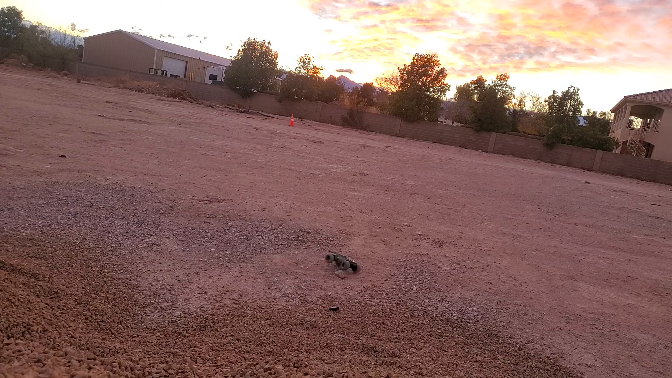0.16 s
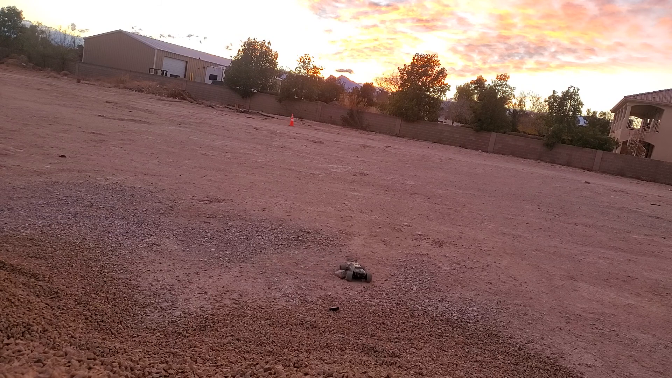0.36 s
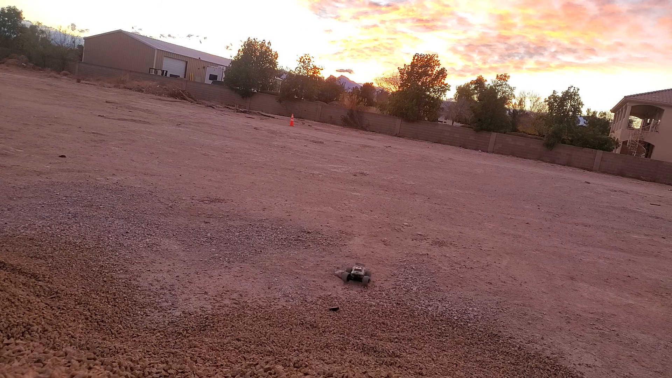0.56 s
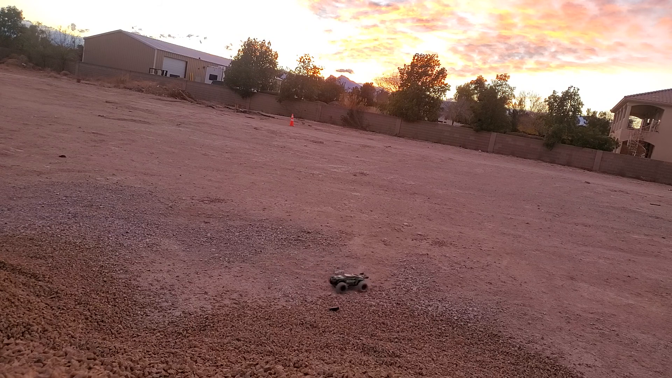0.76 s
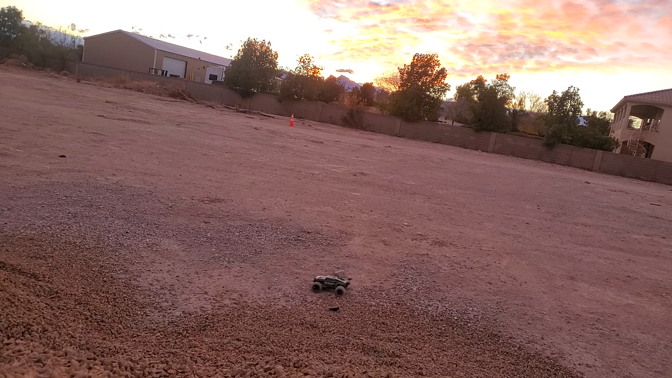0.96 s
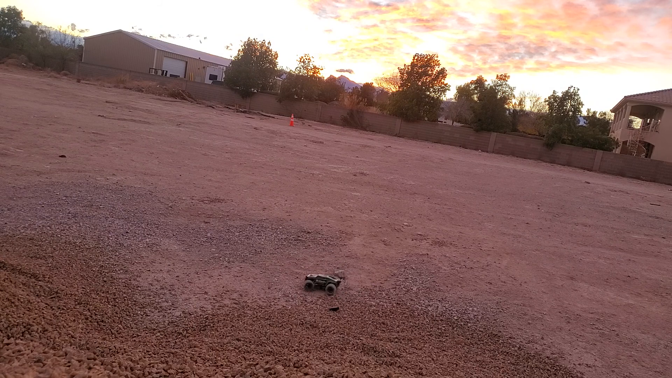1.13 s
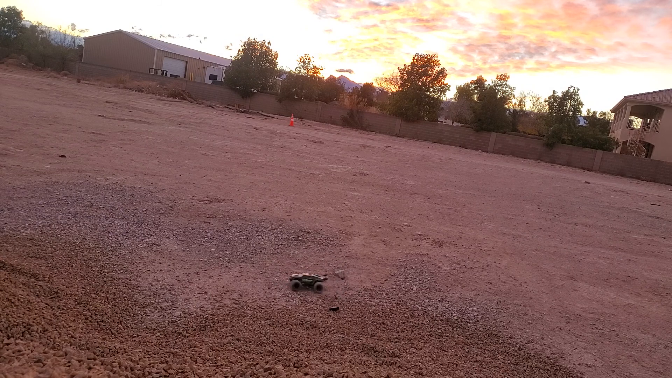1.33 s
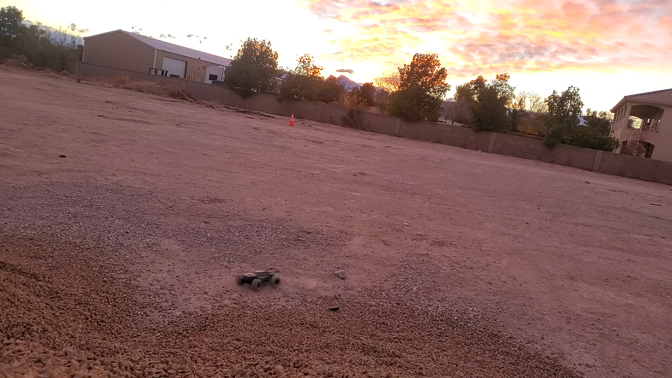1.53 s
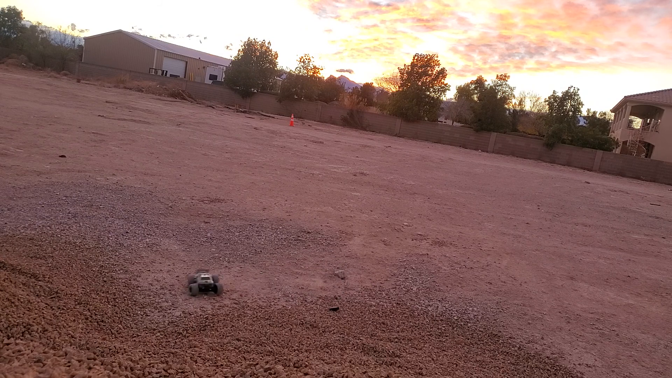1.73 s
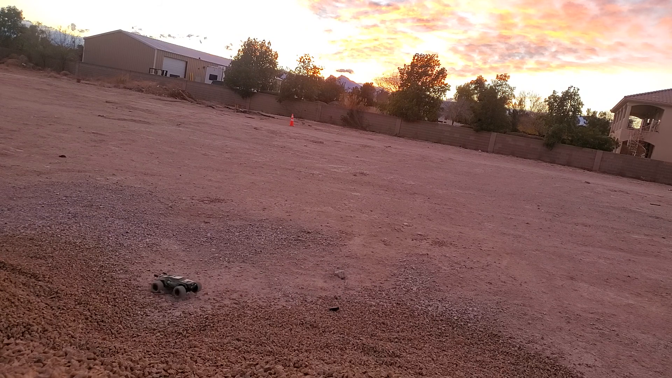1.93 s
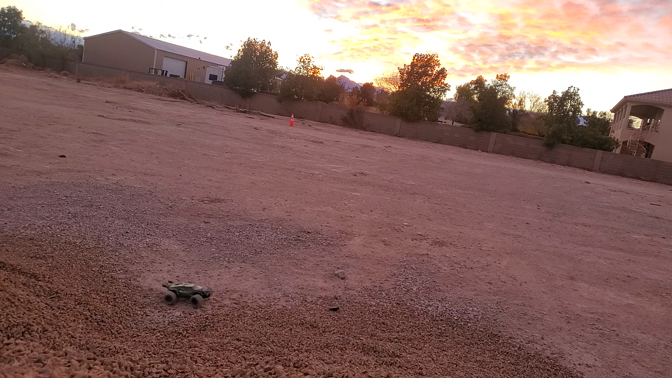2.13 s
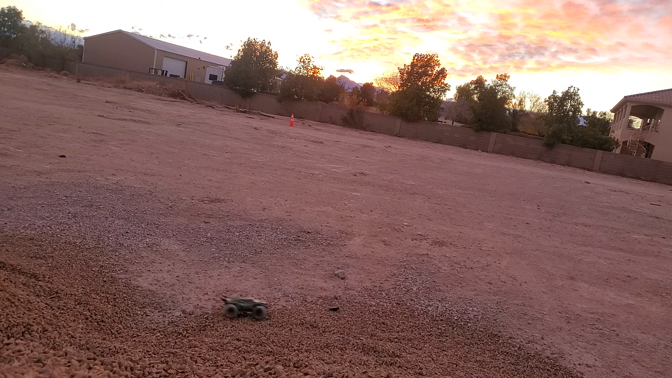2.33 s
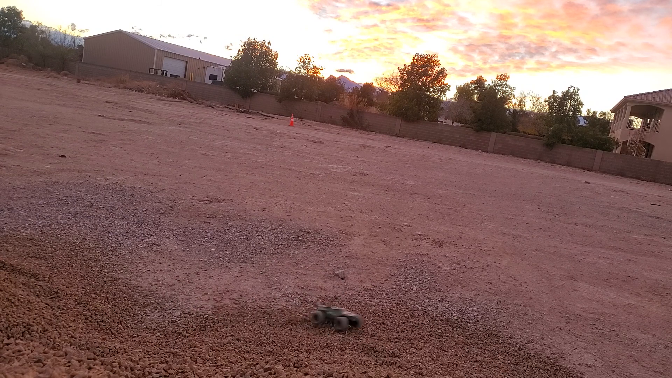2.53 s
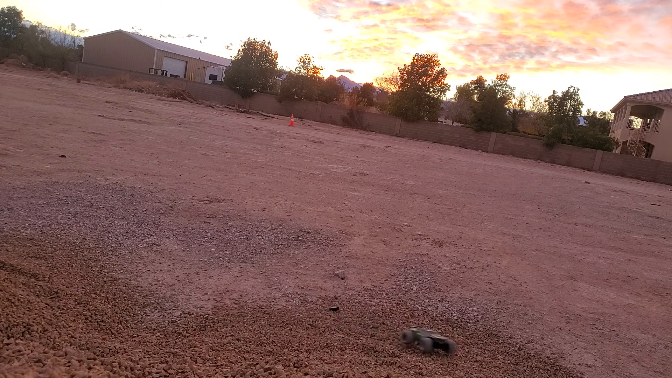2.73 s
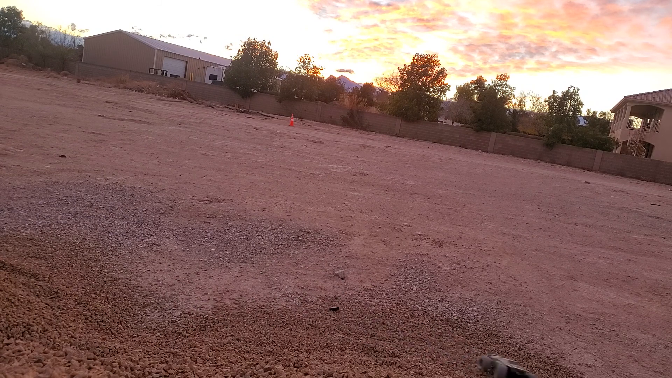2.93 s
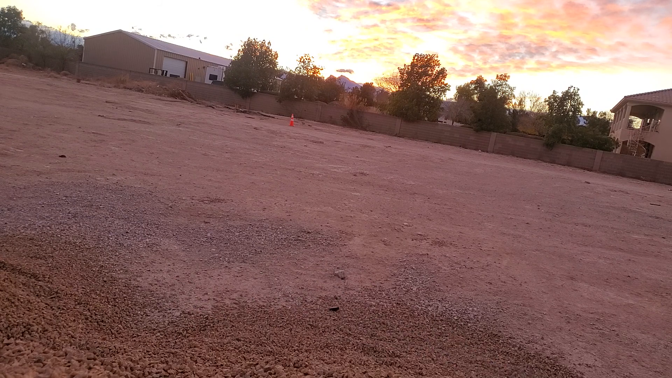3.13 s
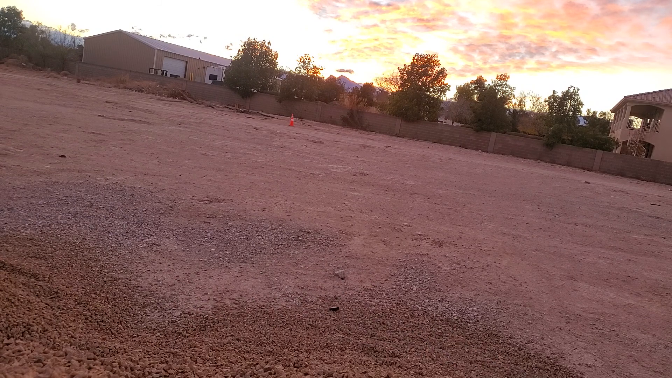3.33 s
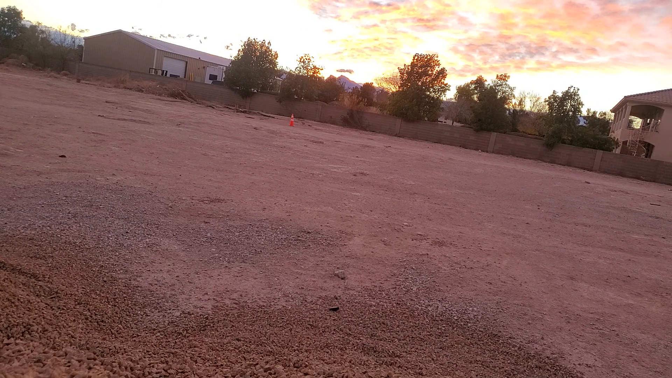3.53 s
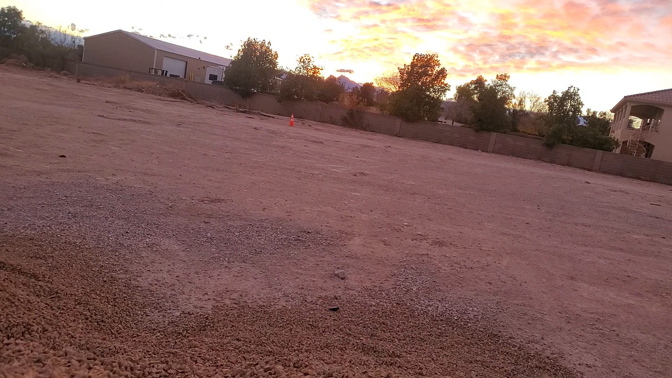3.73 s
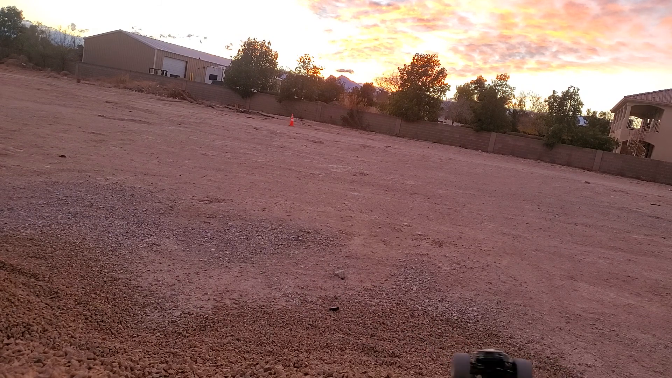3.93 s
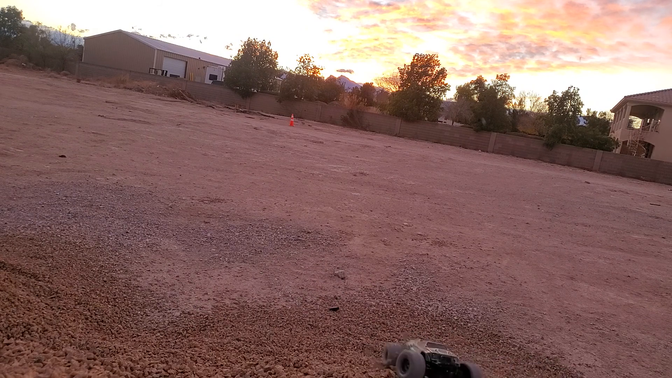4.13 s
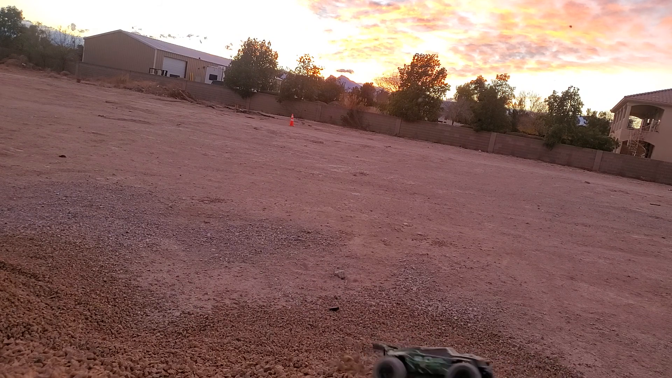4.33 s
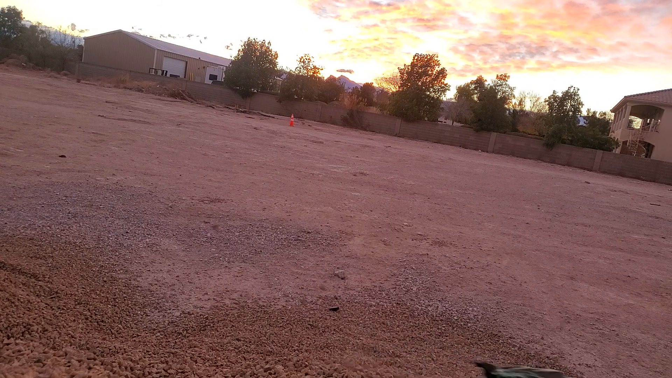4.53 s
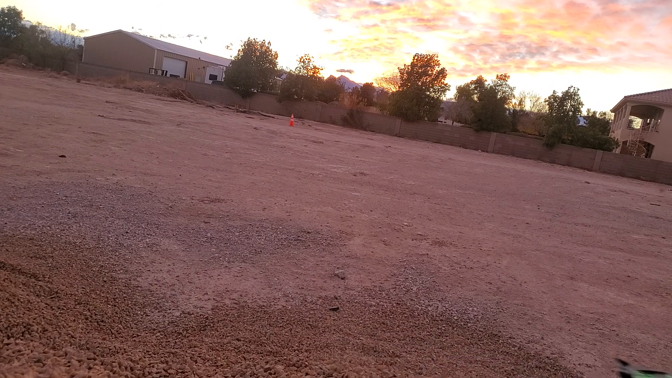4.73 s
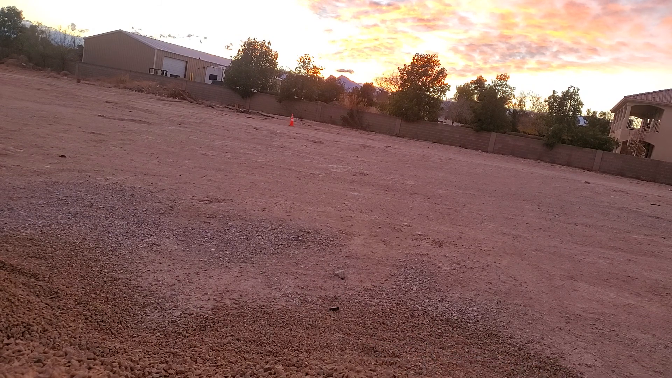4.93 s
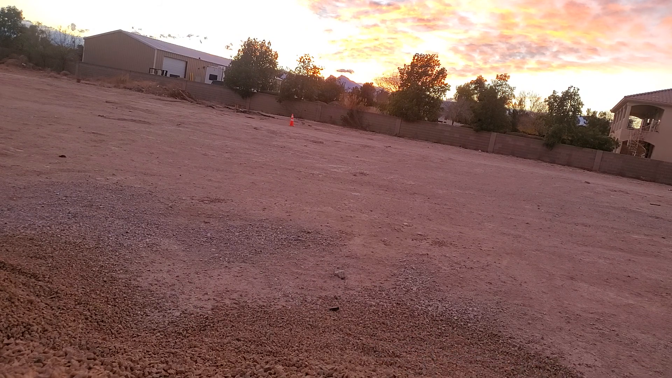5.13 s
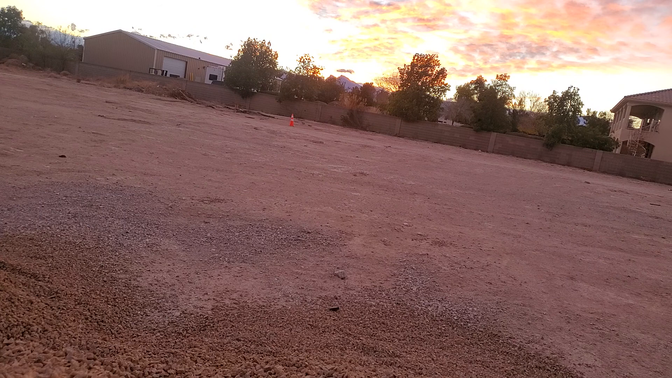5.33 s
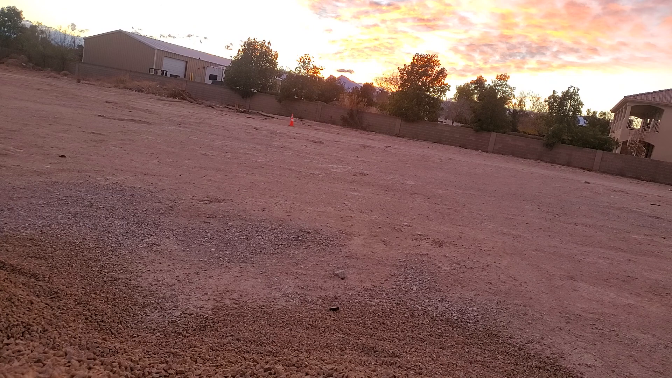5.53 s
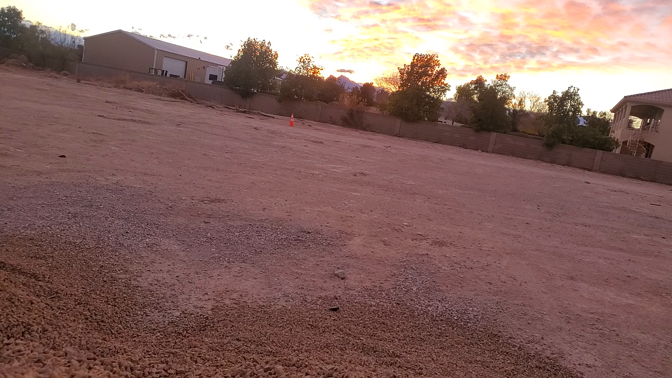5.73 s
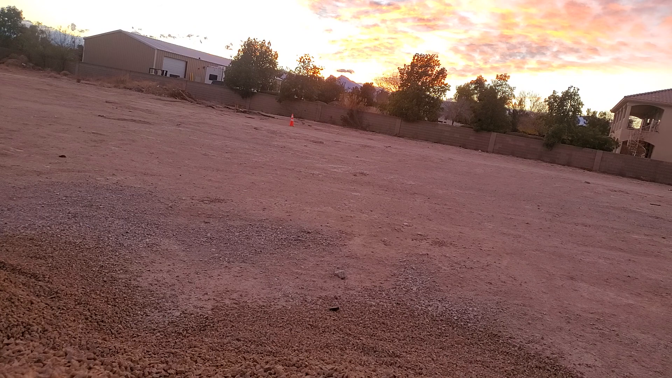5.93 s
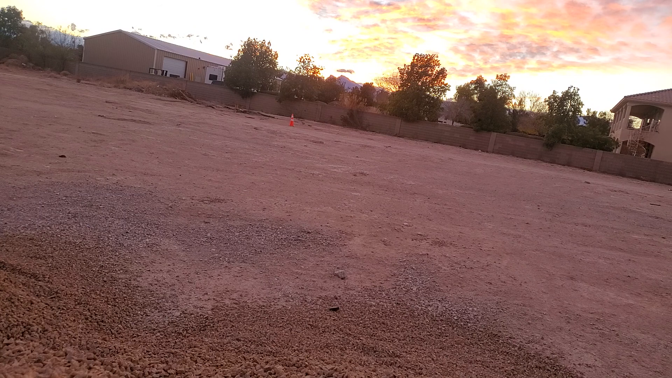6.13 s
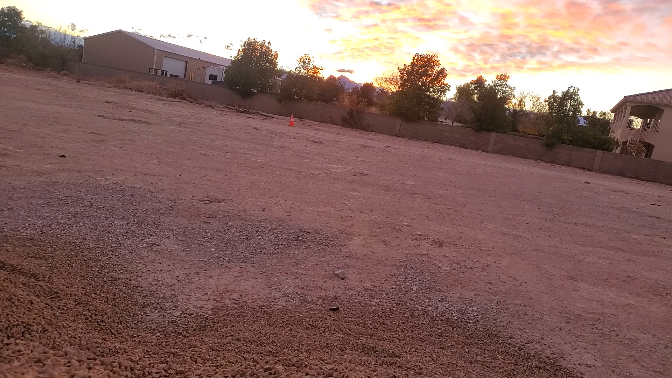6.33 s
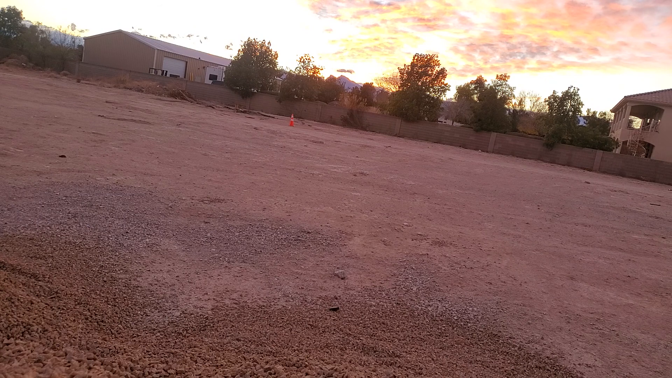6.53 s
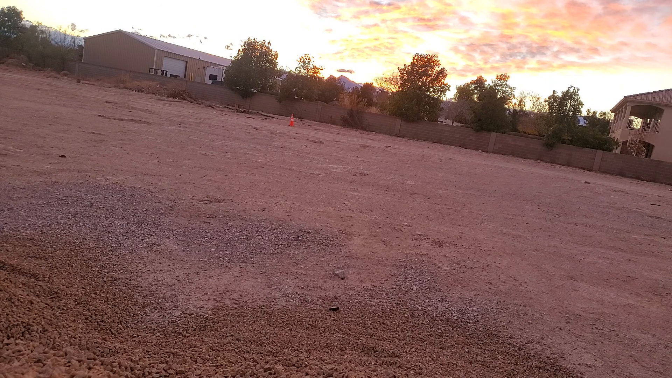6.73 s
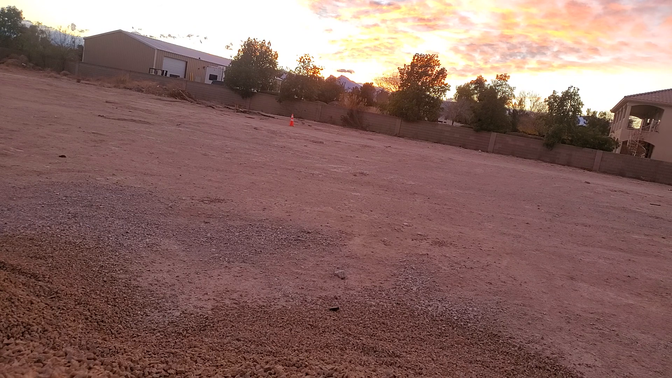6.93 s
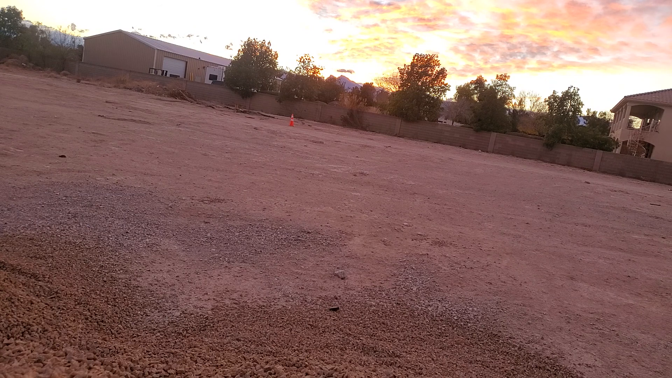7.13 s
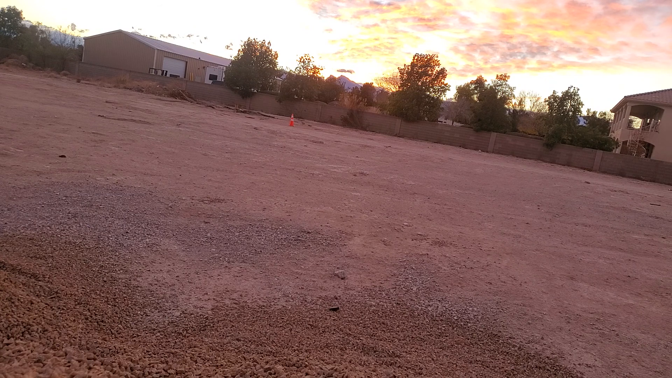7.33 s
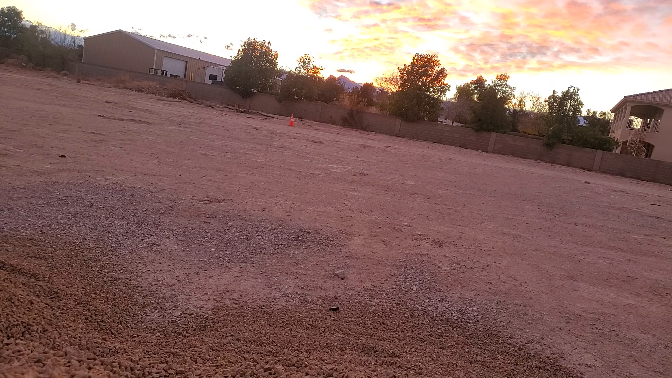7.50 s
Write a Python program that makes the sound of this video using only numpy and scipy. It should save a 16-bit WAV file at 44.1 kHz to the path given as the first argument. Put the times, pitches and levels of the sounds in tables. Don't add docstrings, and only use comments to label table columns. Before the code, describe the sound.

A small electric model car skids and rolls over loose gravel, stones cracking loudly as it passes close, then grit patters and ticks away.

```python
import sys
import numpy as np
from scipy import signal
from scipy.fft import rfft, irfft, next_fast_len
from scipy.io import wavfile
from scipy.ndimage import uniform_filter1d, map_coordinates

SR = 44100
rng = np.random.default_rng(int(sys.argv[2]) if len(sys.argv) > 2 else 0)


def wav_record(signal):
    frames = np.transpose(np.atleast_2d(signal))
    bounded = np.clip(frames, -1, 1)
    quanta = np.round(bounded * 32767).astype(np.int16)
    wavfile.write(sys.argv[1], SR, quanta)


def gain_from_db(level_db):
    decades = np.asarray(level_db, float) / 20
    return 10 ** decades


N = 333428

# time_s, path_mm
BEARING = [(0.0, 2), (1.2, 0), (1.42, -14), (1.95, -52), (2.15, -50), (2.5, -2), (2.72, 24), (2.84, 48),
           (3.2, 85), (3.6, 87), (4.06, 41), (4.3, 27), (4.42, 35), (4.9, 107), (5.5, 148), (6.1, 145),
           (6.94, 100), (7.56, 92)]
# pitch_hz, density_db_per_hz
GRAVEL_SPECTRUM = [(140, -3.5), (250, -2), (400, -2), (650, 3), (1000, -2), (1350, 1.5), (1800, -0.5),
                   (2600, -3.5), (4300, -6), (6400, -2.5), (7900, -11.5), (10500, -11.5), (12500, -7),
                   (15500, -2.5)]


def rms_one(x):
    return x / np.sqrt(np.mean(x ** 2) + 1e-20)


def in_time(rows):
    s, *columns = np.transpose(rows)
    return [np.interp(np.arange(N) / SR, s, c) for c in columns]


def at_hz(points, hz):
    points = np.array(points)
    return np.interp(np.log(hz), np.log(points[:, 0]), points[:, 1])


def drift(rate_hz):
    r = np.exp(-80 * np.pi * rate_hz / SR)
    noise = rng.standard_normal(N // 40 + 2002)
    slow = signal.lfilter([1], [1, -2 * r, r * r], noise)[2000:]
    return np.interp(np.arange(N) / 40, np.arange(len(slow)), rms_one(slow))


def die(clicks, t60_s):
    return signal.lfilter([1], [1, -gain_from_db(-60 / (t60_s * SR))], clicks + 1e-18)


def struck(times_s, level_db):
    clicks = np.zeros(N)
    np.add.at(clicks, (np.asarray(times_s) * SR).astype(int), gain_from_db(level_db))
    return clicks


def grains(per_s, spread_db, clump_db):
    born = rng.random(N) < per_s * gain_from_db(clump_db * drift(14)) / SR
    return born * gain_from_db(spread_db * np.minimum(rng.exponential(1, N), 3))


def bank(spectrum, low_hz, step_oct, envelope):
    bands = round(np.log2(16000 / low_hz) / step_oct)
    edges_hz = np.geomspace(low_hz, 16000, bands + 1)
    white = rng.standard_normal((2, 2, N))
    for k, (low, high) in enumerate(zip(edges_hz, edges_hz[1:])):
        hz = np.sqrt(low * high)
        sos = signal.butter(2, [low, high], "band", fs=SR, output="sos")
        yield hz, gain_from_db(at_hz(spectrum, hz)), signal.sosfilt(sos, white[k % 2] * envelope(hz))


def scattered(band, hz):
    # pitch_hz, likeness_ratio
    likeness = [(150, .97), (600, .955), (1500, .92), (3000, .9), (6000, .66), (9000, .33), (16000, .12)]
    alike = np.clip(at_hz(likeness, hz), 0, 1)
    return band * np.sqrt([[1 + alike], [1 - alike]])


def resonance(x, hz, width_hz):
    r = np.exp(-np.pi * width_hz / SR)
    poles = [1, -2 * r * np.cos(2 * np.pi * hz / SR), r * r]
    return signal.lfilter((1 - r * r) / 2 * np.array([1, 0, -1]), poles, x)


def traffic():
    # pitch_hz, density_db_per_hz
    spectrum = [(24, -32), (40, 0.5), (81, 1), (237, -9), (433, -21), (751, -14), (1590, -21.5),
                (2150, -49), (2600, -55), (3800, -47), (4500, -31), (6170, -51), (7730, -38), (14800, -61),
                (16000, -38)]
    # time_s, level_db
    gusts = [
        (0.0, -43),
        (0.57, -52),
        (1.28, -48),
        (2.0, -49),
        (2.46, -47),
        (3.47, -48),
        (3.62, -44.5),
        (5.6, -53),
        (7.56, -52),
    ]
    # low_hz, high_hz
    fence_gap_hz = [2200, 4100]
    road_lag_samples = 18
    out = 0
    for hz, gain, (shared, own) in bank(spectrum, 44.5, .5, lambda hz: gain_from_db(0.95 * drift(4.6))):
        apart = np.clip((hz / 1800) ** 2, .008, .5)
        road = np.array([np.roll(shared, road_lag_samples * (hz > 150)), shared])
        out = out + gain * (np.sqrt(1 - apart) * road + np.sqrt(apart) * own * [[1], [-1]])
    out = rms_one(signal.sosfilt(signal.butter(4, fence_gap_hz, "bandstop", fs=SR, output="sos"), out))
    deep = signal.sosfilt(signal.butter(2, 120, fs=SR, output="sos"), out)
    return gain_from_db(-50) * (out - deep) + gain_from_db(in_time(gusts)[0]) * rms_one(deep)


def motor_whine():
    # time_s, level_db
    whine = [
        (.33, -95),
        (.38, -77),
        (.53, -74),
        (.58, -95),
    ]
    whine_hz = 12200
    return gain_from_db(in_time(whine)[0]) * np.sin(2 * np.pi * whine_hz * np.arange(N) / SR)


def settling():
    # start_s, peak_db, pitch_hz
    rattles = [(0.7338, -45, 6200), (0.7916, -52, 4700), (0.8116, -50, 6160), (0.853, -51, 4330),
               (0.9188, -59, 4500), (0.935, -52, 3950), (0.968, -46.5, 6300), (1.0066, -52, 5600),
               (1.0994, -62, 4450), (1.1318, -60, 4430), (1.1533, -53, 5000), (1.1852, -64, 5080),
               (1.2022, -49, 4370), (1.2566, -54, 4440)]
    # time_s, pitch_hz, level_db
    squeak = [
        (1.0, 4700, -90),
        (1.008, 4900, -55),
        (1.035, 6600, -56),
        (1.05, 6500, -64),
        (1.062, 6600, -59),
        (1.07, 6400, -90),
    ]
    out, t = np.zeros(N), np.arange(round(0.037 * SR)) / SR
    roughness = uniform_filter1d(rng.standard_normal((len(rattles), len(t))), size=40)
    for (s, peak_db, hz), rough in zip(rattles, roughness):
        i = round(s * SR)
        ring = gain_from_db(peak_db + 2.0 - 60 * t / 0.024) * np.sin(2 * np.pi * hz * t)
        out[i:i + len(t)] += ring * (1 + 3.5 * rough)
    hz, level_db = in_time(squeak)
    return out + gain_from_db(level_db) * np.sin(2 * np.pi * np.cumsum(hz) / SR)


def pebbles(grit_gain):
    # start_s, peak_db
    landings = [(1.5396, -28), (1.6282, -25.5), (2.1701, -21), (2.231, -21), (2.367, -16), (2.4244, -35),
                (2.4495, -26), (2.6933, -39), (2.772, -29), (2.923, -34), (2.9765, -19.5), (3.187, -23),
                (3.449, -23), (3.476, -15.5), (3.5828, -22), (3.735, -26), (3.8881, -6), (3.925, -11.5),
                (3.977, -10), (4.0467, -15), (4.3036, -30), (4.32, -11.5), (4.4664, -19), (4.5106, -7),
                (4.5219, -7), (4.5525, -10), (4.5614, -13), (4.7282, -14), (4.828, -27), (4.9678, -22),
                (0.043, -33), (0.147, -34), (0.3106, -51), (0.4248, -46), (0.5456, -48), (0.7336, -44),
              (0.796, -46), (0.8525, -50), (0.9314, -48), (1.0247, -50), (1.205, -38), (1.275, -37),
              (5.026, -35), (5.073, -32), (5.1476, -35), (5.2859, -51), (5.336, -39), (5.4377, -42),
              (5.647, -39), (5.872, -47), (6.0984, -59), (6.3287, -41), (6.373, -41), (6.518, -33),
              (6.6171, -43), (6.72, -34), (7.1437, -49), (7.251, -41), (7.3908, -45), (7.5315, -63),
                (0.9133, -45), (1.26, -37), (1.7185, -45), (1.7409, -32), (1.816, -30), (1.9031, -40),
                 (1.9584, -36), (2.4906, -29), (2.5583, -24), (2.6517, -24), (3.246, -35), (3.4072, -39),
                 (4.931, -19.5), (5.471, -45)]
    # start_s, peak_db
    pings = [(1.539, -20), (1.556, -19), (1.6282, -37), (2.2313, -19), (2.4498, -18), (2.6, -17),
             (2.7711, -20), (2.9223, -16), (3.4486, -29), (3.7349, -29), (4.048, -14), (4.058, -10),
             (4.3036, -22), (4.828, -12), (5.6461, -29)]
    # start_s, peak_db
    ticks = [(5.6968, -52), (5.7672, -51), (5.8724, -50), (6.1373, -52), (6.1907, -46), (6.2152, -47),
             (6.2431, -41), (6.29, -47), (6.3294, -41), (6.4207, -40), (6.4466, -41), (6.4756, -40),
             (6.4875, -34), (6.5165, -34), (6.5529, -43), (6.5938, -43), (6.6177, -43), (6.6562, -46),
             (6.719, -40), (6.8003, -51), (6.8622, -54), (6.9729, -44), (7.0353, -58), (7.0922, -56),
             (7.1141, -51), (7.1435, -51), (7.173, -41), (7.2024, -52), (7.2149, -41), (7.2498, -49),
             (7.3211, -53), (7.3391, -46), (7.391, -47), (7.4259, -48), (7.4444, -36), (7.5431, -52)]
    # start_s, peak_db
    trickle = [(0.7022, -37), (0.7342, -41), (0.7626, -45), (0.797, -49), (0.8524, -46), (0.8604, -45),
               (0.9133, -47), (0.9314, -32), (0.9666, -35), (1.0045, -46), (1.024, -45), (1.0479, -47),
               (1.0654, -44)]
    # start_s, peak_db
    patter = [(5.0263, -33), (5.0732, -34), (5.147, -35), (5.1889, -37), (5.2273, -50), (5.2548, -50),
              (5.2737, -48), (5.2852, -47), (5.3126, -43), (5.3371, -37), (5.3889, -49), (5.4368, -51),
              (5.4708, -48), (5.4942, -51), (5.5451, -57), (5.564, -51), (5.5955, -49), (5.6464, -30)]
    # start_s, peak_db
    fling = [(1.5382, -20), (1.5557, -27), (1.628, -34), (1.6689, -34), (1.7188, -36), (1.7408, -40),
             (1.7557, -35), (1.7842, -36), (1.8146, -35), (1.9029, -38), (1.9583, -36), (2.0396, -35),
             (2.0596, -30), (2.1344, -30), (2.1688, -27), (2.2197, -31), (2.2312, -26), (2.2586, -31),
             (2.3055, -32), (2.3659, -22), (2.4242, -25), (2.4497, -23), (2.4901, -29), (2.538, -29),
             (2.5569, -26), (2.6013, -24)]
    s, peak_db = np.transpose(landings)
    spray = gain_from_db(-5) * grit_gain * grains(40, spread_db=5.7, clump_db=6.0)
    clicks = struck(s, peak_db - 6.5) + spray
    tick = die(clicks, 0.0073) + gain_from_db(-24) * die(clicks, 0.09)
    bands = bank(GRAVEL_SPECTRUM, 4630, .4, lambda hz: 1)
    out = tick * rms_one(sum(gain * scattered(band, hz) for hz, gain, band in bands))
    contacts = clicks + gain_from_db(10) * struck(*np.transpose(pings))
    contacts = contacts + gain_from_db(9) * struck(*np.transpose(ticks + trickle + patter + fling))
    out[0] += gain_from_db(8.0) * resonance(resonance(contacts + 1e-18, 13300, 4000), 18400, 5000)
    return out


def stones():
    # start_s, peak_db, pitch_hz
    breaking = [(0.649, -19.5, 3960), (1.024, -43.5, 1720), (1.431, -21, 1850), (2.156, -17, 1330),
                (2.1846, -14, 6500), (2.3696, -23, 1760), (2.831, -25, 1490), (2.866, -20.5, 5370),
                (3.248, -21, 3980), (3.477, -20, 4090), (3.5364, -36, 4390), (3.6755, -32, 4170),
                (3.7477, -12, 4620), (3.8282, -17, 5720), (3.883, -11, 6670), (3.926, -7.5, 5430),
                (3.9765, -8, 5680), (4.027, -10, 5790), (4.0577, -22.5, 5540), (4.145, -12.5, 2080),
                (4.206, -36, 1250), (4.315, -9, 1650), (4.454, -22, 1950), (4.477, -19, 1200),
                (4.502, -9, 1670), (4.554, -7, 5400), (4.6945, -15.5, 5170), (4.7192, -38, 4320),
                (4.9738, -40, 3410), (5.4375, -56, 1630),
                (0.044, -25.5, 3530), (0.146, -34, 1430), (0.309, -34, 4360), (0.424, -36, 4040),
             (0.558, -26, 5500), (0.7333, -40, 6370), (1.024, -32.5, 1770), (1.202, -54, 4330),
             (1.3577, -20, 1420), (1.784, -24, 6800), (1.9772, -22, 1500), (2.545, -25, 1870),
             (2.682, -21.5, 5990), (2.785, -23.5, 1400), (3.1612, -23.5, 4200), (3.2974, -20.5, 4000),
             (5.337, -59, 3000), (5.646, -51, 4500), (5.7186, -32.5, 2580), (5.873, -40, 2000),
             (6.098, -42, 2500), (7.388, -30, 1600), (7.522, -48, 3000),
                (1.4494, -15, 1560), (2.241, -23, 1210), (3.0904, -42, 6070), (3.3624, -26, 5270),
              (3.8884, -18, 5860), (3.9947, -7.5, 5640), (4.0794, -26, 1760), (4.2778, -15, 1680),
              (4.4792, -17, 1210), (4.512, -11, 5920), (4.521, -12, 1800), (4.5615, -9.5, 5060),
              (4.643, -23, 5160), (4.928, -24, 6890)]
    # start_s, peak_db, pitch_hz
    cracks = [(1.283, -35, 4390), (4.0577, -4, 5540), (4.0744, -12, 5650), (4.0944, -24, 5730),
              (4.2777, -27, 2600), (4.3206, -26, 2840), (4.4644, -29, 4290), (4.4792, -8, 6650),
              (4.5034, -17, 5260), (4.7344, -29, 4340), (4.9746, -30, 3410), (5.0734, -44, 6840),
              (5.6216, -39, 2840), (5.7179, -41, 2580)]
    s, peak_db, stone_hz = np.transpose(breaking + cracks)

    def burst(hz):
        level_db = peak_db - 0.5 - 9 * np.abs(np.log2(hz / stone_hz))
        return die(struck(s, level_db), 0.031 + 12.0 / hz)

    bands = bank(GRAVEL_SPECTRUM, 1033, 0.45, burst)
    return sum(gain * scattered(band, hz) for hz, gain, band in bands)


def chassis_knocks():
    # start_s, peak_db, pitch_hz
    knocks = [(0.515, -38, 694), (0.603, -29.5, 702), (1.322, -30.5, 970), (1.372, -36, 700),
              (1.431, -36, 574), (1.642, -31, 640), (1.994, -30.5, 810), (2.153, -28, 790),
              (2.325, -30.5, 684), (2.646, -36.5, 316), (2.695, -25.5, 496), (2.855, -34.5, 554),
              (3.155, -31, 810), (3.359, -29.5, 530), (3.385, -33, 500), (3.604, -32, 690),
              (3.674, -28, 645), (3.912, -26, 806), (3.983, -24, 515), (4.073, -25.5, 845),
              (4.173, -26.5, 530), (4.224, -29, 560), (4.277, -17, 740), (4.313, -24, 552),
              (4.457, -21, 826), (4.724, -24, 660), (4.888, -31.5, 450), (5.441, -45, 336),
              (6.185, -32.5, 656), (7.383, -33.5, 667)]
    out, t = np.zeros(N), np.arange(round(.06 * SR)) / SR
    rise = 1 - np.exp(-t / 0.00032)
    luck = rng.random((len(knocks), 2))
    for (s, peak_db, hz), (a, b) in zip(knocks, luck):
        overtone_hz, push_hz = hz * (1.42 + 0.59 * a), 170 + 120 * b
        shell = np.sin(2 * np.pi * hz * t) * gain_from_db(-60 * t / 0.045)
        overtone = 0.83 * np.sin(2 * np.pi * overtone_hz * t) * gain_from_db(-60 * t / 0.01)
        push = 0.46 * np.sin(2 * np.pi * push_hz * t) * gain_from_db(-60 * t / 0.031)
        knock = gain_from_db(peak_db + 2.0) * rise * (shell + overtone + push)
        i = round(s * SR)
        out[i:i + len(t)] += knock[:N - i]
    return out


def tent(peak_s, rise_s, fall_s):
    swell_db, flank = 24, 1.35
    t = np.arange(0, N, 32) / SR - peak_s
    return -swell_db * np.maximum(-t / rise_s, t / fall_s) ** flank


def driving():
    # time_s, level_db, brightness_db
    rolling = [(0.0, -50.5, -5.5), (0.27, -63, -7.5), (1.06, -65.5, -5.5), (1.085, -88, 10), (1.2, -92, 6),
               (1.6, -56.5, 0), (1.84, -60, 6), (2.1, -46.5, 1), (2.75, -52, 8), (3.3, -48.5, 2),
               (3.75, -40.5, 2), (4.05, -39, 4.5), (4.6, -37, 0), (4.85, -50, 10), (5.1, -61.5, -3),
               (5.42, -78.5, 7), (6.0, -68.5, -10.5), (7.56, -69.5, -0.5)]
    # peak_s, level_db, swell_s, brightness_db
    skids = [(0.63, -43.5, 0.19, -6), (1.3, -50, 0.036, -12), (1.453, -38, 0.27, -8),
             (1.56, -49.5, 0.17, 2), (2.07, -43, 0.31, -19), (2.161, -42, 0.27, -7),
             (2.36, -40.5, 0.052, 0), (2.7, -54.5, 0.1, 10), (3.12, -45.5, 0.73, -6),
             (3.434, -39, 0.14, -22), (3.621, -35.5, 0.023, -30), (4.3, -41, 0.11, -11),
             (4.5, -38, 0.1, -16), (4.743, -31, 0.024, -15), (4.91, -41, 0.044, -9),
             (5.66, -57.5, 0.3, -18), (5.75, -52.5, 0.18, -17.5), (6.21, -49.5, 0.21, -12.5),
             (6.33, -50, 0.19, -7.5), (6.5, -57.5, 0.22, -3.5), (6.68, -54, 0.42, -2),
             (7.14, -66, 0.29, 0.5), (7.394, -51.5, 0.19, -6)]
    # peak_s, level_db, brightness_db
    jolts = [(0.0, -43, -20), (0.325, -54.5, -1.5), (0.52, -51, -7), (0.82, -58, -23), (0.745, -66, -1),
             (0.812, -67, 3), (0.862, -64.5, 8), (0.95, -67, 7), (1.035, -69, 11), (1.03, -61, -13),
             (1.06, -71.5, 19), (1.21, -77, -11), (1.652, -48, 1), (1.758, -50, 4), (2.26, -54, -2),
             (2.507, -41, -7), (3.903, -35, -16), (4.38, -32.5, -34), (4.641, -36, -5), (4.818, -39.5, -32),
             (5.02, -54, -25), (5.29, -61, -2), (5.446, -52.5, -24), (5.62, -56.5, -17), (6.05, -71, -21),
             (6.82, -74, -13), (5.879, -59, -14)]
    upper_db = [-3.5, -4.5, -1.5, -2.5]
    upper_share = [0, .15, .55, 1.0]
    layer_db = np.reshape([-4.5] + upper_db, (-1, 1))
    share = np.reshape([0.05] + upper_share, (-1, 1))
    level_db, bright_db = in_time(rolling)
    bursts = [tent(s, swell_s, 0.76 * swell_s) + db + share * bright for s, db, swell_s, bright in skids]
    bursts += [tent(s, 0.029, 0.03) + db + share * bright for s, db, bright in jolts]
    power = np.sum(gain_from_db(np.array(bursts)) ** 2, axis=0)
    power = uniform_filter1d(np.repeat(power, 32, axis=1)[:, :N], size=64)
    return gain_from_db(layer_db) * np.sqrt(power + gain_from_db(level_db + share * bright_db) ** 2)


def shell_ring(x):
    # pitch_hz, width_hz, level_db
    shell = [(614, 500, -10.5), (930, 330, -0.5), (1600, 1800, -3)]
    return x + sum(gain_from_db(db) * resonance(x, hz, width_hz) for hz, width_hz, db in shell)


def gravel(gains):
    layer_top_hz = [650, 1100, 3000, 7700]
    cracks = grains(900, spread_db=3.8, clump_db=3.0)
    region = rng.random(N)

    def crackle(hz):
        reach = np.exp(-((np.log2(hz / 140) / 7 - region) / 0.16) ** 2)
        burst = rms_one(die(cracks * reach, 0.031 + 1.0 / hz))
        return np.sqrt(0.55 + 0.46 * burst ** 2) * gain_from_db(1.78 * drift(16.0))

    layers = np.zeros((5, 2, N))
    for hz, gain, band in bank(GRAVEL_SPECTRUM, 137.7, .25, crackle):
        layers[np.searchsorted(layer_top_hz, hz)] += gain * scattered(band, hz)
    layers[:3] = shell_ring(layers[:3])
    return [gain * rms_one(layer) * np.sqrt(2) for gain, layer in zip(gains, layers)]


def heard_from_bearing(shared, apart, shortcut_per_mm, order):
    # time_s, level_db
    scatter = [(0, 3), (1.6, 1), (1.85, -1), (2.3, -1), (2.5, 1), (2.7, 2), (2.82, -4.5), (4.08, -4.5),
               (4.3, 2), (4.55, -2), (4.68, 1), (4.82, -3), (5.15, 6), (6.05, 6), (6.5, 0), (7.0, -1),
               (7.56, -1)]
    path_mm = uniform_filter1d(in_time(BEARING)[0], size=4000, mode="nearest")
    lag = path_mm * (1 - shortcut_per_mm * np.abs(path_mm)) / 343000 * SR
    apart = apart * gain_from_db(in_time(scatter)[0])
    left = map_coordinates(shared + apart, [np.arange(N) - lag], order=order, mode="nearest")
    return np.array([left, shared - apart])


def scene():
    # time_s, scrape_over_rumble_db, finest_treble_db
    distance = [(0.0, 0, 3), (0.65, 0.5, -11), (1.45, 1, -1), (2.0, 2.5, -0.5), (2.6, 0.5, 4.5),
                (3.2, 2.5, 2.5), (3.65, -0.5, 0), (3.9, 1, 2), (4.4, 1.5, 0), (5.0, 0.5, 2), (5.7, -2, 1),
                (6.4, 1, 3), (7.56, 2.5, 0)]
    gains = driving()
    rumble, drum, scrape, crunch, grit = gravel(gains)
    tilt_db, air_db = in_time(distance)
    low = gain_from_db(-0.5 * tilt_db) * rumble + drum + gain_from_db(tilt_db) * scrape
    low[0] += chassis_knocks()
    high = crunch + grit + stones() + pebbles(gains[-1])
    high[0] += motor_whine() + settling()
    finest = signal.sosfilt(signal.butter(2, 10900, "high", fs=SR, output="sos"), high)
    high = high + (gain_from_db(air_db) - 1) * finest
    path_mm, sides = in_time(BEARING)[0], [[.5], [-.5]]
    low_shade = gain_from_db((0.6 - 0.015 * path_mm) * sides)
    high_shade = gain_from_db(-0.0225 * path_mm * sides)
    low = low_shade * heard_from_bearing(*low, 0, order=3)
    high = high_shade * heard_from_bearing(*high, .0002, order=4)
    return low + traffic() + high


def left_port(pair):
    # pitch_hz, gain_db, lead_rad
    left = np.array([(100, 1.4, .1), (250, 1.8, 0), (450, .3, .1), (650, 1.5, .1), (1300, 0, -.15),
                     (2500, .5, .08), (5500, -.5, .15), (7700, 1.5, .8), (11000, 0, 1.0)])
    size = next_fast_len(N + 4096)
    hz = np.maximum(np.arange(size // 2 + 1) * SR / size, 1)
    response = gain_from_db(at_hz(left[:, :2], hz)) * np.exp(1j * at_hz(left[:, ::2], hz))
    return np.array([irfft(rfft(pair[0], size) * response, size)[:N], pair[1]])


def low_pass(x):
    return signal.sosfilt(signal.butter(12, 16990, fs=SR, output="sos"), x)


def record(dry):
    # pitch_hz, width_hz, level_db
    port_peak = (4285, 410, -2.5)
    # pitch_hz, width_hz
    port_dip = (7930, 2240)
    # pitch_hz, width_hz, share taken out
    housing_edges = [(7350, 700, 0.24), (10880, 860, 0.1)]
    dry = left_port(dry)
    peak = gain_from_db(port_peak[2]) * resonance(dry, *port_peak[:2])
    dry = dry + peak - 0.59 * resonance(dry, *port_dip)
    dry = dry - sum(share * resonance(dry, hz, width_hz) for hz, width_hz, share in housing_edges)
    dry = signal.sosfilt(signal.butter(2, 42, "high", fs=SR, output="sos"), dry)
    mix = signal.sosfilt(signal.ellip(12, .5, 36, 15920, fs=SR, output="sos"), dry)
    return low_pass(mix)


dry = scene()
out = record(dry)
wav_record(out)
```